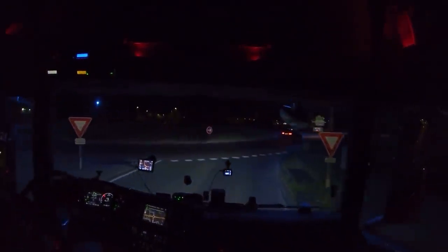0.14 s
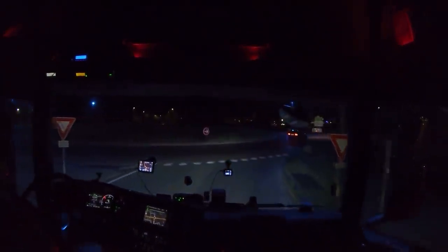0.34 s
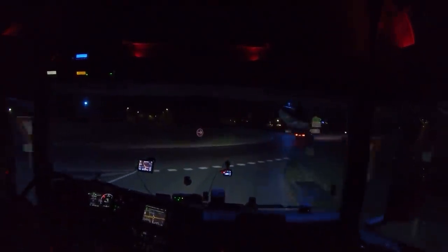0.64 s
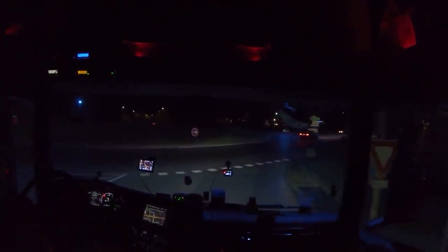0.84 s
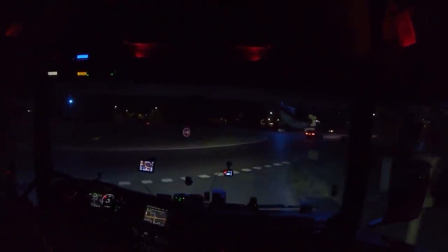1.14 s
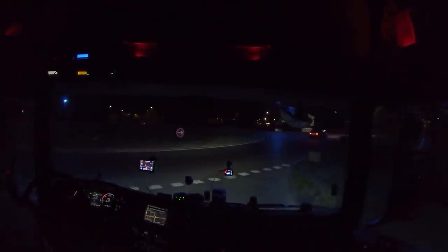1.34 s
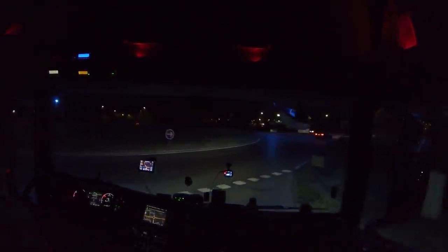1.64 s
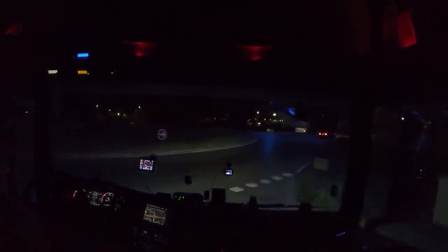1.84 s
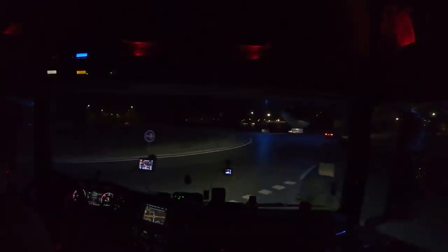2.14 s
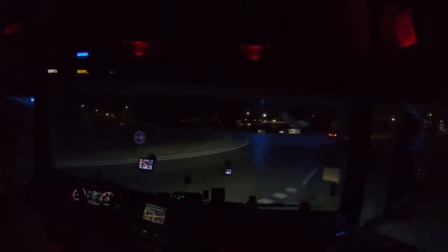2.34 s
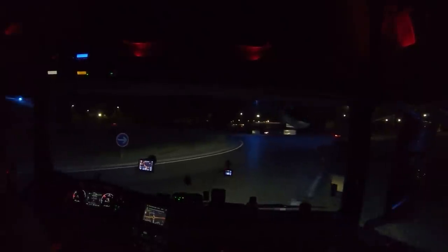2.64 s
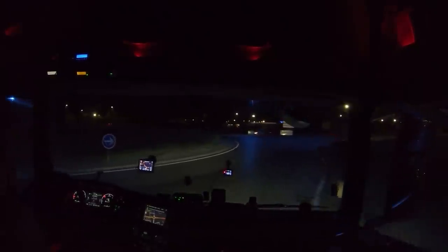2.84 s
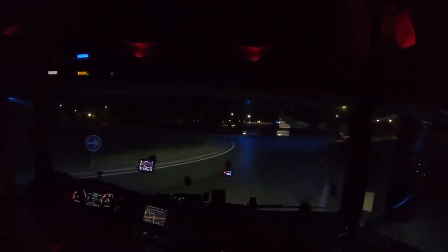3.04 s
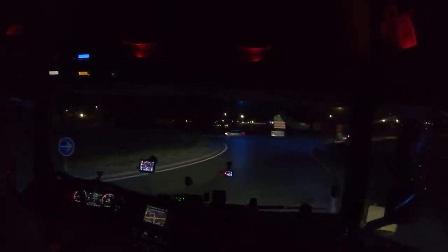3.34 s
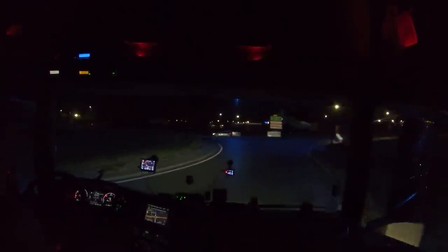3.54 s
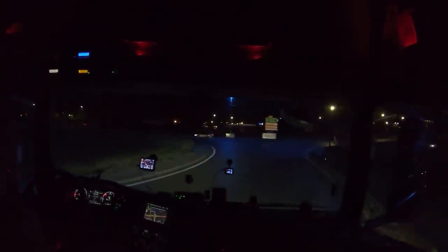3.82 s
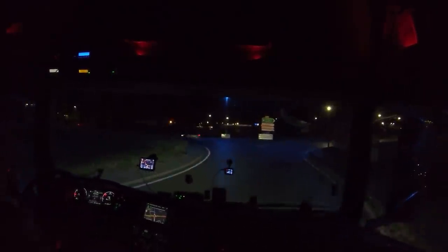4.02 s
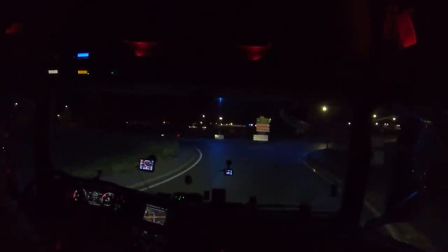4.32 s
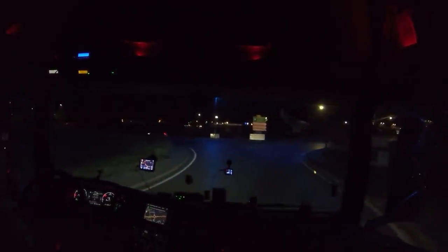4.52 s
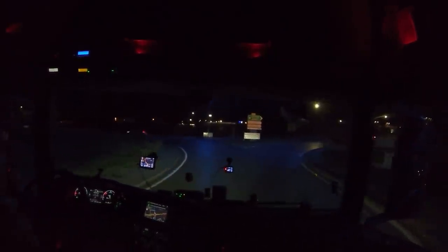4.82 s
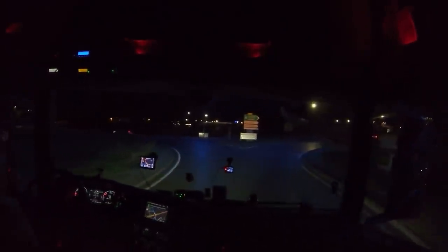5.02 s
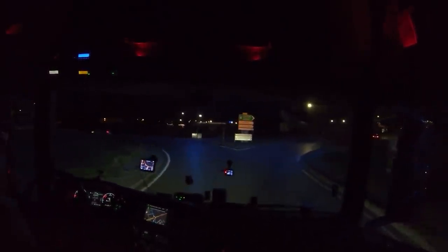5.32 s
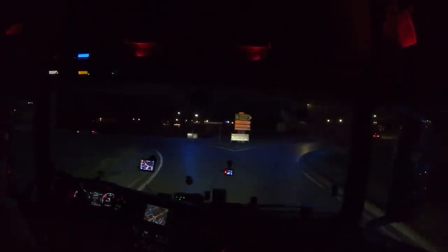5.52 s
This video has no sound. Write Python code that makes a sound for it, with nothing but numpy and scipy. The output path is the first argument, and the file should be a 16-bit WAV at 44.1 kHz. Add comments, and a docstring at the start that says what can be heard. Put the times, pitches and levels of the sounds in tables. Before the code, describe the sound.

Inside a heavy truck cab, a deep diesel boom slowly sags in pitch over road rumble, with loose metal jingles, plastic clacks and knocks.

```python
"""A truck engine booms in its cab, slowly losing speed through a roundabout, over road rumble and dull clatter.
The engine's tones are sines locked to its turning; they beat against a drive turning about a quarter faster.
Road drone, combustion clatter, hiss and a late rustle are coloured noise; shaken resonances make the rumble.
Metal jingles, trim clacks, small ticks and a flapping panel are tiny random contacts that ring resonances.
Chinks, pings, the panel's thud and knocks on the microphone's mount are single blows with a few bounces."""
import sys
import numpy as np
from scipy import signal
from scipy.io import wavfile

SR = 44100
rng = np.random.default_rng(int(sys.argv[2]) if len(sys.argv) > 2 else 0)


def wav_record(signal):
    """Record a signal, one row per channel, as 16-bit PCM in the file named by sys.argv[1]."""
    frames = np.transpose(np.atleast_2d(signal))
    bounded = np.clip(frames, -1, 1)
    # unit amplitude maps onto the largest positive 16-bit level
    quanta = np.round(bounded * 32767).astype(np.int16)
    wavfile.write(sys.argv[1], SR, quanta)


N = 250047

CUTOFF_HZ = 15700     # nothing much is heard above this
USUAL_ROAD_DB = -23   # usual level on the road-roughness curve

# resonances of loose metal, jingling or stirring: f/Hz, width/Hz, relative level/dB
METAL_MODES = [(3620, 660, 1), (4200, 230, -6), (4540, 220, -4.5), (5240, 5100, 0.5), (6800, 120, -8),
               (7060, 79, -13), (7170, 160, -7), (7800, 360, -12)]


def from_db(db):
    """Turn decibels into a gain."""
    return 10 ** (np.asarray(db) / 20)


def rms_one(x):
    """Scale to an average power of 1."""
    return x / np.sqrt(np.mean(x ** 2) + 1e-20)


def in_time(rows):
    """Read a curve of (time, value) points at every sample."""
    times, values = np.transpose(rows)
    return np.interp(np.arange(N) / SR, times, values)


def at_hz(points, hz):
    """Read a curve of (frequency, value) points, evenly by musical interval."""
    freqs, values = np.transpose(points)
    return np.interp(np.log(hz), np.log(freqs), values)


def drift(rate_hz):
    """Slow random wander of spread 1: noise smoothed twice, with little movement faster than the rate."""
    step = 40   # samples between points of the wander
    r = np.exp(-2 * np.pi * rate_hz * step / SR)
    settle = 2000
    noise = rng.standard_normal(N // step + settle + 2)
    slow = signal.lfilter([1], [1, -2 * r, r * r], noise)[settle:]
    return np.interp(np.arange(N) / step, np.arange(len(slow)), rms_one(slow))


def resonate(x, hz, width):
    """A resonance passes its own pitch at gain 1; the narrower it is, the longer it rings."""
    r = np.exp(-np.pi * width / SR)
    top = np.array([1, 0, -1]) * (1 - r * r) / 2
    # the tiny offset keeps the filter fast in silence
    return signal.lfilter(top, [1, -2 * r * np.cos(2 * np.pi * hz / SR), r * r], x + 1e-18)


def soften(blows, cutoff_hz):
    """A soft contact lasts longer, so its force weakens above a certain pitch."""
    return signal.sosfilt(signal.butter(2, cutoff_hz, fs=SR, output="sos"), blows + 1e-18)


def spread(pair, hz):
    """Two signals become left and right, as alike as the cab makes them at this pitch."""
    # f/Hz, likeness of left and right (1 = the same)
    likeness = [(60, 0.94), (150, 1), (270, 0.96), (360, 0.99), (480, 0.73), (650, 0.71), (880, 0.34),
                (1200, 0.12), (1600, 0.45), (2200, 0.58), (8000, 0.11)]
    alike = np.clip(at_hz(likeness, hz), -1, .999)
    middle = np.sqrt(1 + alike) * pair[0]
    side = np.sqrt(1 - alike) * pair[1]
    return middle + side * np.array([[1], [-1]])


def coloured_noise(spectrum, patchy_db):
    """Stereo noise in third-octave bands, each flickering by its own wander; average power 1."""
    edges = 14 * 2 ** (np.arange(31) / 3)
    white = rng.standard_normal((2, 2, N + SR // 4))   # a quarter second extra lets the filters settle
    out = 0
    for k, (low, high) in enumerate(zip(edges, edges[1:])):
        hz = np.sqrt(low * high)
        flicker = drift(4.2)
        if spectrum[0][0] <= hz <= spectrum[-1][0]:
            band_filter = signal.butter(2, [low, high], "band", fs=SR, output="sos")
            band = signal.sosfilt(band_filter, white[k % 2])[:, -N:]
            out = out + spread(band, hz) * from_db(at_hz(spectrum, hz) + patchy_db * flicker)
    return rms_one(out)


def tone(cycles, level_db, waver_db, slip):
    """A sine locked to a turning shaft, a little unsteady in strength and timing (slip in radians)."""
    phase = 2 * np.pi * (cycles + rng.random()) + slip * drift(7.1)
    return np.sqrt(2) * from_db(level_db + waver_db * drift(5)) * np.sin(phase)


def stepped(speed_hz, above_db, below_db, step_hz, width_hz):
    """A level glides from one value to another as the engine slows through a certain speed."""
    passed = (1 + np.tanh((step_hz - speed_hz) / (2 * width_hz))) / 2
    return above_db + (below_db - above_db) * passed


def engine_boom(turns, speed_hz, slowed, build_db):
    """Tones at whole multiples ("orders") of the engine's turning, plus the drive's; alike in both ears."""
    # orders that step as they slide into or out of the cab's air resonances:
    # multiple, level above the step/dB, level below it/dB, engine speed at the step/Hz, step width/Hz
    stepping_orders = [(2, -31, -22.5, 39.11, 0.3), (5, -33.5, -38.5, 38.0, 0.14),
                       (6, -46.5, -40, 38.25, 0.21)]
    # orders that swell in passing a cab resonance: multiple, level on top/dB, resonance f/Hz, width/Hz
    resonant_orders = [(1, -26.5, 38.3, 1.3), (4, -35.3, 151.5, 17)]
    # quieter orders: multiple, level when fast/dB, level when slow/dB
    quiet_orders = [(3, -33, -53), (7, -61, -48), (8, -53, -58.5), (9, -54, -59.5), (11, -55, -61.5)]
    # the drive's throb grows as the engine slows:
    # level above the step/dB, level below it/dB, engine speed at the step/Hz, step width/Hz
    throb = (-26.5, -19, 38, 0.9)
    drive_ratio, drive_rocks = 1.256, .18   # drive turns per engine turn; depth of rocking (0-1)
    out = np.zeros(N)
    for multiple, *step in stepping_orders:
        k = round(multiple)
        out += tone(k * turns, stepped(speed_hz, *step), waver_db=.22 * k, slip=.015 * k)
    for multiple, top_db, peak_hz, width_hz in resonant_orders:
        k = round(multiple)
        off_peak = (k * speed_hz - peak_hz) / (width_hz / 2)
        level_db = top_db - 10 * np.log10(1 + off_peak ** 2) + build_db
        out += tone(k * turns, level_db, waver_db=1, slip=.08)
    for multiple, fast_db, slow_db in quiet_orders:
        level_db = fast_db + (slow_db - fast_db) * slowed + build_db
        out += tone(round(multiple) * turns, level_db, waver_db=1.5, slip=.12)
    # the drive rocks the strength of the engine's orders and beats against them
    drive = drive_ratio * turns
    out *= 1 + drive_rocks * np.cos(2 * np.pi * drive)
    out += tone(drive, stepped(speed_hz, *throb), waver_db=.5, slip=.04)
    return out + tone(2 * drive, -36 - 12 * slowed, waver_db=2.0, slip=0.78)


def clatter(turns, slowed, build_db):
    """Combustion noise swells slightly with two firings a turn and rings panels that come and go."""
    # f/Hz, relative level per Hz/dB
    colour = [(210, -34), (350, -7), (431, -5), (473, -7.5), (515, -10.5), (697, -10), (925, -12),
              (1260, -14.5), (1790, -23), (2030, -20.5), (3340, -48.5), (4340, -67.5), (7350, -120)]
    # panels rung by the combustion: f/Hz, width/Hz, relative level/dB
    panels = [(432.5, 16, -7.5), (601, 41, -9.5), (800, 53, -18), (930.3, 36, -7.5), (1978, 40, -19),
              (2090, 290, -22.5)]
    panel_swell_db, panel_slowed_db = 3, -3.5   # spread of the coming and going; change when slowest
    firing = 1 + .044 * np.cos(4 * np.pi * turns)
    out = coloured_noise(colour, patchy_db=1.5) * firing
    for hz, width, level_db in panels:
        swell_db = panel_swell_db * drift(2.3) + panel_slowed_db * slowed
        noise = rng.standard_normal((2, N)) * firing
        out += from_db(level_db + swell_db) * rms_one(spread(resonate(noise, hz, width), hz))
    right_louder = from_db([[-.5], [.5]])
    return from_db(-44.5 - 3.5 * slowed + build_db) * rms_one(out) * right_louder


def cab_rumble(road_db):
    """The road's unevenness shakes the cab on its mounts: noise through low resonances, alike in both ears."""
    # f/Hz, width/Hz, relative level/dB
    cab_shake = [(24.95, 8.9, 3.5), (60.4, 46, -4)]
    out = 0
    for hz, width, level_db in cab_shake:
        road = rng.standard_normal(N + SR)   # the extra second lets the shaking settle
        shake = resonate(resonate(road, hz, width), hz, width)[-N:]
        out = out + from_db(level_db) * rms_one(shake)
    return from_db(road_db - 2.5) * rms_one(out)


def road_drone(turns, slowed, road_db, build_db):
    """Low noise chugs with every engine turn, follows the road a little and fades as the engine slows."""
    # f/Hz, relative level per Hz/dB
    colour = [(55, -1.5), (85, 3.5), (120, -0.5), (160, -7), (215, -4.5), (265, -17.5), (340, -12),
              (450, -25.5), (700, -35)]
    follows_road, chug_depth = 0.045, .4   # share of the road's swing in dB; depth (0-1)
    level_db = -32 - 1.5 * slowed + follows_road * (road_db - USUAL_ROAD_DB) + build_db
    chug = rms_one(1 + chug_depth * np.cos(2 * np.pi * turns))
    return from_db(level_db) * chug * coloured_noise(colour, patchy_db=.8)


def hiss(slowed):
    """High noise that fades as the engine slows."""
    # f/Hz, relative level per Hz/dB
    colour = [(2200, 5.5), (3200, 2), (4300, -6.5), (5500, -19.5), (6500, -9.5), (7500, -2), (8800, -33.5),
              (10500, -33.5), (15000, -33)]
    return from_db(-62.5 - 5.5 * slowed) * coloured_noise(colour, patchy_db=1.75)


def stirring(road_db):
    """Small metal things tick finely all the time, in bunches, more often where the road is rough."""
    contacts_per_s, bunch_db = 260, 3.5   # usual rate; how much it wanders
    rate = contacts_per_s * from_db(bunch_db * drift(3) + .5 * (road_db - USUAL_ROAD_DB))
    contacts = (rng.random(N) < rate / SR) * rng.standard_normal((2, N))
    out = 0
    for k, (hz, width, mode_db) in enumerate(METAL_MODES):
        gain = (-1) ** k * from_db(mode_db) / np.sqrt(width)
        out = out + gain * spread(resonate(contacts, hz, width), hz)
    return from_db(-74.5) * rms_one(out)


def rattle(events, modes, contacts_per_s, attack_s, first_db, tail_db, tail_s, ring_q, ring_db, level_db):
    """A first contact and a chatter of tiny ones, building and dying, ring the modes and the part's own note.

    ring_q is the sharpness of that note (pitch over width); the tail is a fading noise from the cab."""
    out = np.zeros((2, N))
    age = np.arange(SR // 4) / SR
    for s, peak_db, decay_s, ring_hz in events:
        touches = rng.random((2, age.size)) < contacts_per_s / SR
        contacts = touches * rng.standard_normal(touches.shape) * np.minimum(age / attack_s, 1)
        contacts[0, 0] = from_db(first_db)
        fade = np.exp(-2 * np.maximum(age - attack_s, 0) / decay_s)
        chatter = contacts * np.sqrt(SR / contacts_per_s) * fade
        cab_tail = from_db(tail_db) * np.exp(-age / tail_s) * rng.standard_normal(touches.shape)
        force = from_db(peak_db + level_db) * (chatter + cab_tail)
        start = round(s * SR)
        own_note = (ring_hz, ring_hz / ring_q, ring_db)
        for k, (hz, width, mode_db) in enumerate([*modes, own_note]):
            gain = (-1) ** k * from_db(mode_db) * np.sqrt(SR / (np.pi * width))
            ring = gain * spread(resonate(force, hz, width), hz)
            out[:, start:start + age.size] += ring[:, :N - start]
    return out


def struck(events, modes):
    """A blow and three quick bounces set a part's modes ringing freely, each with its own strength."""
    hop_s, hop_db, scatter_db = .005, -5, 2   # mean gap; loss per bounce; scatter of each strength
    contact_ratio = 2.5   # larger, lower parts are softer: force weakens above this multiple of the pitch
    out, size = np.zeros((2, N)), SR // 4
    for s, peak_db in events:
        hops = np.append(0, np.cumsum(hop_s * rng.uniform(.5, 1.5, size=3)))
        count = len(hops)
        start = round(s * SR)
        for hz, width, mode_db in modes:
            scatter = scatter_db * rng.standard_normal(count)
            strength = from_db(peak_db + mode_db + hop_db * np.arange(count) + scatter)
            blows = np.zeros((2, size))
            side_signs = rng.choice([-1, 1], count)
            blows[:, (hops * SR).astype(int)] = strength * np.array([np.ones(count), side_signs])
            soft = soften(blows, min(contact_ratio * hz, CUTOFF_HZ))
            ring = SR / (2 * np.pi * width) * spread(resonate(soft, hz, width), hz)
            out[:, start:start + size] += ring[:, :N - start]
    return out


def metal_jingles():
    """Loose metal jingles with fairly few, separate contacts that ring its high modes."""
    # t/s, relative level/dB, decay/s, own note f/Hz
    jingles = [(.01, -53, 0.11, 6100), (.354, -54.5, 0.078, 4720), (.414, -52.5, 0.041, 4760),
               (1.299, -52, 0.036, 4520), (1.348, -52, 0.028, 4255), (1.371, -52, 0.059, 4060),
               (1.455, -60, .07, 7300), (2.211, -59, 0.057, 4450), (2.871, -50.5, 0.039, 7400),
               (3.312, -53.5, 0.063, 3888), (3.466, -50.5, 0.022, 4357), (3.493, -49, 0.064, 7900),
               (3.537, -46.5, 0.06, 4300), (3.578, -55.5, 0.061, 5000), (3.668, -58.5, 0.063, 4500),
               (4.262, -54.5, 0.076, 6500), (4.455, -58.5, 0.093, 4770), (4.822, -54, 0.022, 4213),
               (4.938, -57.5, 0.032, 6000)]
    return rattle(jingles, METAL_MODES, contacts_per_s=1800, attack_s=.003, first_db=-3.5,
                  tail_db=-13.5, tail_s=0.035, ring_q=8, ring_db=-4.5, level_db=-11.0)


def mount_knocks():
    """A knock rocks the microphone body: the ring swells in and pushes the two sides nearly in opposition."""
    # t/s, relative level/dB
    knocks = [(.1035, -29), (.1312, -28), (3.3428, -21.3), (3.5148, -20), (3.5225, -13.8), (4.3833, -27)]
    # modes of the mount: f/Hz, width/Hz, relative level/dB
    mount_modes = [(800, 350, -20), (1310, 160, 0), (2250, 500, -24)]
    bounce_s, bounce_db = .0065, -15   # mean gap of three bounces; their level below the knock
    lag_s, contact_hz = .00006, 3000   # delay of the right side; softness of the contact
    blows = np.zeros(N)
    for s, peak_db in knocks:
        blows[round(s * SR)] += from_db(peak_db)
        bounces = s + bounce_s * np.cumsum(rng.uniform(.8, 1.2, size=3))
        blows[(bounces * SR).astype(int)] += from_db(peak_db + bounce_db)
    blows = soften(blows, contact_hz)
    ring = np.zeros(N)
    for hz, width, level_db in mount_modes:
        gain = from_db(level_db) * np.e * SR / (2 * np.pi * width)
        # two resonances in a row make the ring swell before it dies
        ring += gain * resonate(resonate(blows, hz, width), hz, width)
    t = np.arange(N) / SR
    return np.array([ring, -np.interp(t - lag_s, t, ring)])


def trim_clacks():
    """Plastic trim clacks: dense, quickly dying contacts ring its broad, lower modes."""
    # t/s, relative level/dB, decay/s, own note f/Hz
    clacks = [(.163, -48.5, 0.015, 1800), (.306, -55.5, 0.022, 3230), (.415, -52.5, 0.019, 2800),
              (.765, -56.5, 0.036, 4270), (.797, -54.5, 0.03, 3800), (1.279, -48, 0.037, 2589),
              (1.293, -52, 0.023, 2600), (1.302, -51, 0.031, 3300), (1.373, -52.5, 0.044, 2690),
              (2.583, -54.5, 0.033, 2900), (3.31, -51, 0.032, 3800), (3.521, -45, .014, 2100),
              (3.538, -45, 0.022, 3730), (3.884, -57.5, .03, 3300), (4.042, -49.5, 0.02, 2238),
              (4.172, -58, .01, 4400), (4.295, -48, 0.033, 1900), (4.702, -54, 0.018, 4200),
              (5.555, -62, 0.024, 3298)]
    # f/Hz, width/Hz, relative level/dB
    trim_modes = [(950, 60, -3.5), (1240, 130, 4.5), (1840, 97, 3), (2320, 400, 2.5), (3160, 810, 0),
                  (3640, 160, -4), (4350, 400, -7.5), (7600, 1200, -14)]
    return rattle(clacks, trim_modes, contacts_per_s=3500, attack_s=.003, first_db=-1.5,
                  tail_db=-13, tail_s=0.043, ring_q=8, ring_db=0, level_db=-9.5)


def small_ticks():
    """Small sharp ticks: very dense contacts that start and end almost at once."""
    # t/s, relative level/dB, decay/s, own note f/Hz
    ticks = [(.166, -49, 0.012, 7430), (1.638, -52, 0.014, 4800), (3.515, -41, 0.0086, 7400),
             (3.5235, -42, .007, 4360), (4.3412, -36.5, 0.0037, 7060), (4.704, -52.5, 0.0093, 5400),
             (4.941, -48, 0.0082, 6800), (5.2025, -42, 0.0079, 8200)]
    # f/Hz, width/Hz, relative level/dB
    tick_modes = [(3200, 1800, 0.5), (5500, 2500, -12), (7900, 1400, 0)]
    return rattle(ticks, tick_modes, contacts_per_s=17000, attack_s=0.00018, first_db=0.0,
                  tail_db=-22, tail_s=.015, ring_q=6, ring_db=-1.5, level_db=-14.5)


def steel_chinks():
    """A small steel piece is struck and rings narrow high modes."""
    # t/s, relative level/dB
    chinks = [(.355, -63), (.416, -60), (1.306, -62), (1.375, -61), (1.386, -58), (2.872, -60),
              (2.882, -56.5), (2.917, -65)]
    # f/Hz, width/Hz, relative level/dB
    steel_modes = [(4520, 35, -2), (4680, 53, -7), (6700, 40, -3.5), (7320, 27, -8), (7400, 70, -5),
                   (7800, 90, -16)]
    return struck(chinks, steel_modes)


def flapping_panel():
    """On the bumps a loose panel buzzes against its frame and lands with a hollow thud."""
    # t/s, relative level of the thud/dB, relative level of the buzz/dB
    flaps = [(.891, -42, -49.5), (1.667, -41, -47), (2.509, -39.5, -51.5), (3.362, -45, -51),
             (3.671, -48, -57)]
    # modes of the thud: f/Hz, width/Hz, relative level/dB
    thud_modes = [(901, 24, 2), (1960, 45, -10.5)]
    # modes of the buzz: f/Hz, width/Hz, relative level/dB
    buzz_modes = [(1300, 180, 1), (1670, 80, 3), (2070, 110, 0), (2360, 330, 0.5), (3020, 220, -2.5),
                  (3560, 220, -1), (4400, 700, -6), (7900, 2000, -13)]
    own_note_hz = thud_modes[0][0]
    buzzes = [(s, buzz_db, .045, own_note_hz) for s, _, buzz_db in flaps]
    buzz = rattle(buzzes, buzz_modes, contacts_per_s=3500, attack_s=0.0068, first_db=-7.5,
                  tail_db=-15, tail_s=.038, ring_q=14, ring_db=4.5, level_db=-9)
    thuds = [(s + .004, thud_db) for s, thud_db, _ in flaps]
    return buzz + struck(thuds, thud_modes)


def hard_pings():
    """Hard parts ping or knock, each a blow on a single mode."""
    # t/s, relative level/dB, f/Hz, width/Hz
    pings = [(3.5385, -43, 3590, 90), (3.541, -43, 4300, 110), (4.046, -45, 2250, 70),
             (4.299, -44, 1920, 80), (5.011, -34, 560, 130)]
    return sum(struck([(s, peak_db)], [(hz, width, 0)]) for s, peak_db, hz, width in pings)


def soft_rustle():
    """Steady coloured noise that swells near the end and holds."""
    # f/Hz, relative level per Hz/dB
    colour = [(900, -8), (1300, 12), (1800, 4), (2500, -7), (3300, -9), (4500, -28), (8000, -40)]
    start_s, attack_s = 5.46, .13
    swell = np.clip((np.arange(N) / SR - start_s) / attack_s, 0, 1)
    return from_db(-52.5) * swell * coloured_noise(colour, patchy_db=0)


def scene():
    """Engine speed and road roughness drive the running sounds; loose things and knocks are added on top."""
    # engine speed: t/s, turning f/Hz
    speed_curve = [(0.0, 39.27), (0.35, 39.54), (0.65, 39.38), (0.85, 39.57), (1.5, 38.67), (1.7, 39.23),
                   (1.9, 38.51), (2.25, 38.37), (2.55, 38.4), (2.9, 37.7), (3.85, 37.07), (4.0, 35.96),
                   (4.25, 36.95), (4.45, 34.82), (4.6, 35.85), (4.8, 34.72), (5.05, 34.66), (5.66, 33.32)]
    # roughness of the road: t/s, level of the cab's shaking before a fixed trim/dB
    road_curve = [(0.0, -29.5), (0.15, -33), (0.75, -19.5), (1.45, -21.5), (1.9, -26.5), (2.1, -20.5),
                  (2.55, -30), (3.35, -21), (3.85, -28), (4.1, -29), (4.4, -29.5), (4.62, -21),
                  (4.8, -31.5), (5.15, -29), (5.66, -25.5)]
    fast_hz, slow_hz = 39.8, 33.2          # engine speeds that count as 0 and 1 on the slowed scale
    crank_wander = .014                    # shared unsteadiness of the crankshaft, in turns
    build_up_s, build_up_db = 0.72, -2.5   # some running sounds start quieter by this and build up
    t = np.arange(N) / SR
    speed_hz = in_time(speed_curve)
    road_db = in_time(road_curve)
    turns = np.cumsum(speed_hz) / SR + crank_wander * drift(4)
    slowed = (fast_hz - speed_hz) / (fast_hz - slow_hz)
    build_db = build_up_db * np.clip(1 - t / build_up_s, 0, 1)

    engine = engine_boom(turns, speed_hz, slowed, build_db) + clatter(turns, slowed, build_db)
    road = cab_rumble(road_db) + road_drone(turns, slowed, road_db, build_db)
    airy = hiss(slowed) + stirring(road_db) + soft_rustle()
    a_little_right = from_db([[-1], [1]])
    plastic = (trim_clacks() + flapping_panel()) * a_little_right
    hard = metal_jingles() + small_ticks() + steel_chinks() + hard_pings()
    return engine + road + airy + plastic + hard + mount_knocks()


def record(dry):
    """Ease in and out over 5 ms; the microphone dulls the treble and the very top is cut."""
    from_edge = np.minimum(np.arange(N), np.arange(N)[::-1]) / SR
    ease = np.sin(np.pi / 2 * np.minimum(from_edge / .005, 1)) ** 2
    dull = signal.sosfilt(signal.butter(4, 9300, fs=SR, output="sos"), dry * ease)
    return signal.sosfilt(signal.cheby2(12, 70, CUTOFF_HZ, fs=SR, output="sos"), dull)


dry = scene()
out = record(dry)
wav_record(out)
```